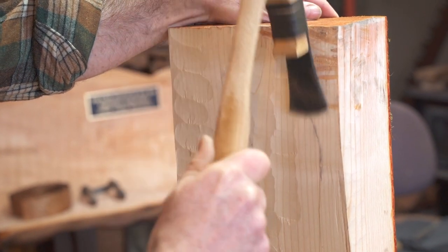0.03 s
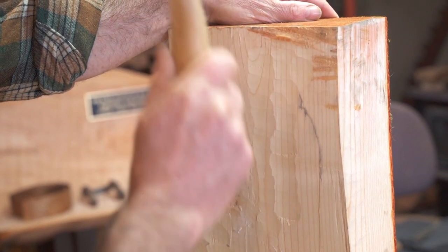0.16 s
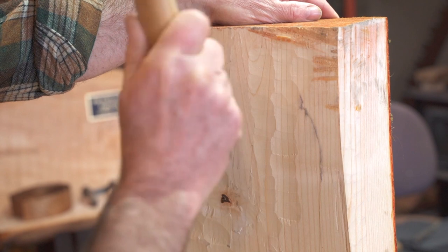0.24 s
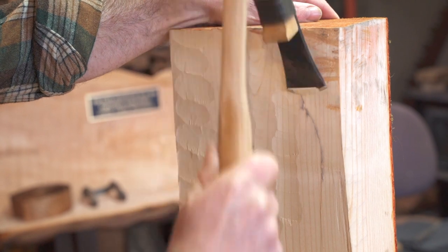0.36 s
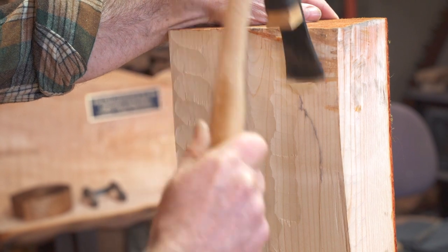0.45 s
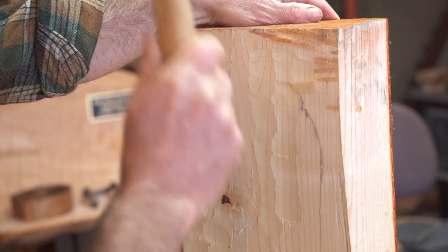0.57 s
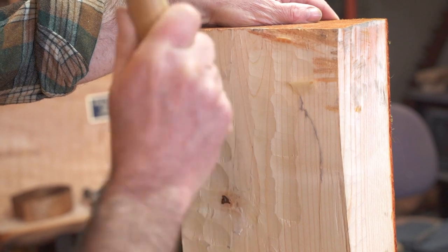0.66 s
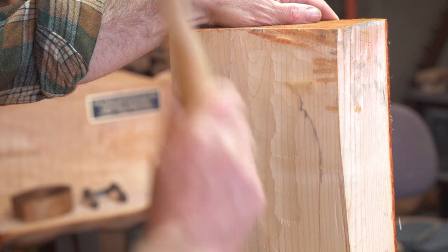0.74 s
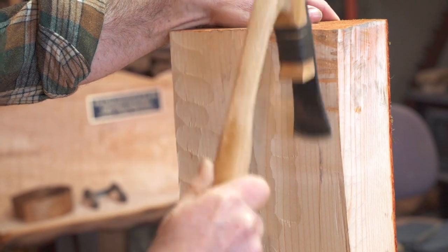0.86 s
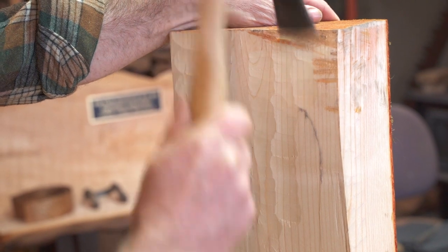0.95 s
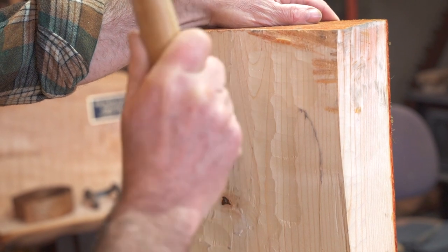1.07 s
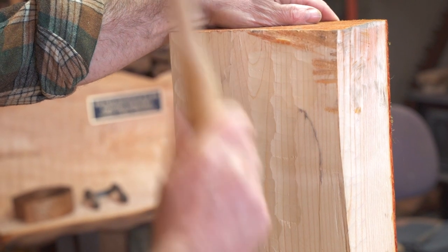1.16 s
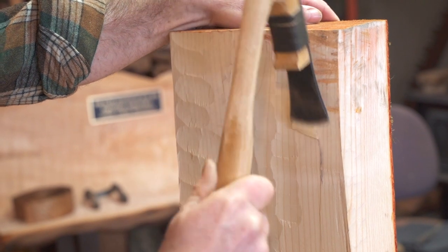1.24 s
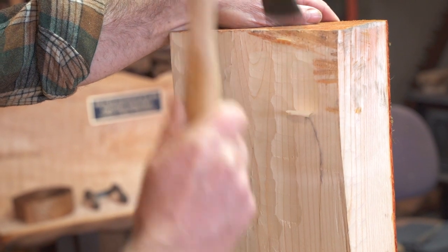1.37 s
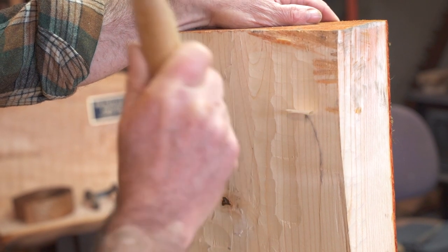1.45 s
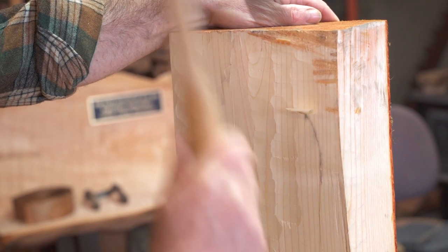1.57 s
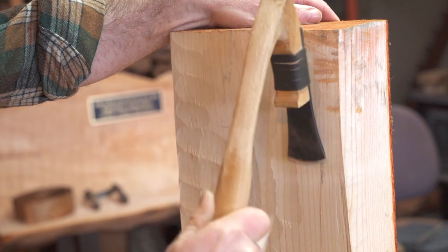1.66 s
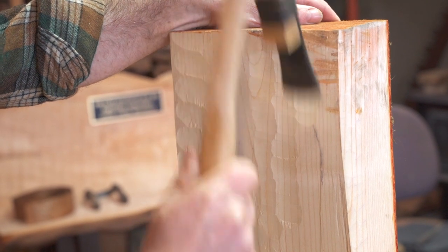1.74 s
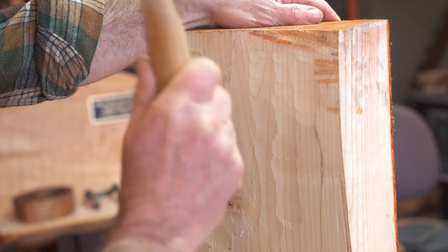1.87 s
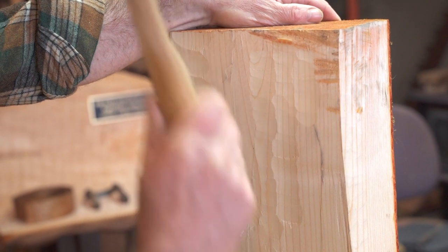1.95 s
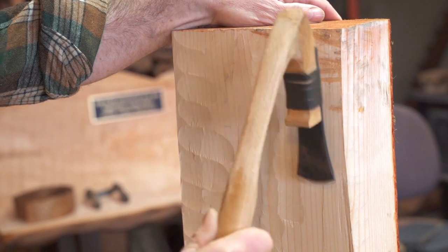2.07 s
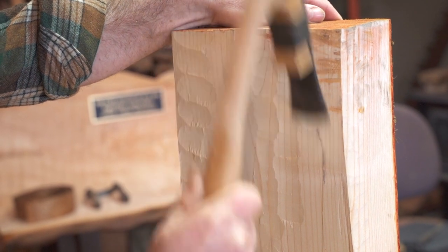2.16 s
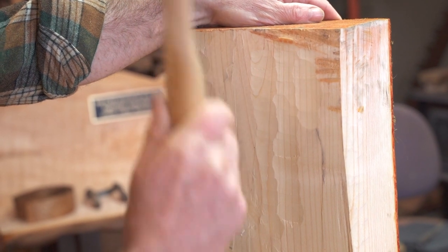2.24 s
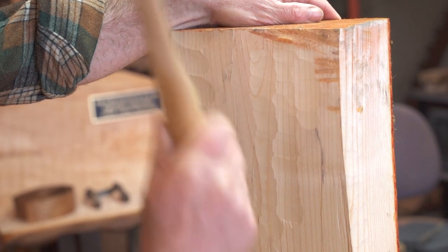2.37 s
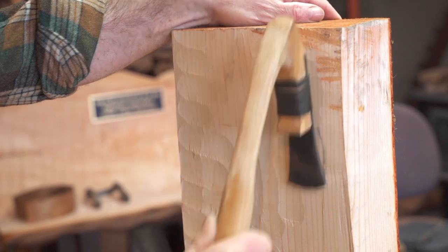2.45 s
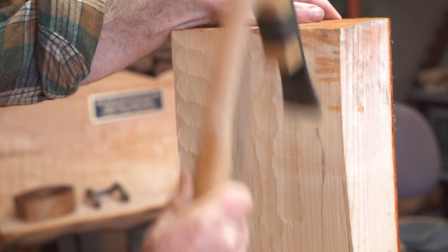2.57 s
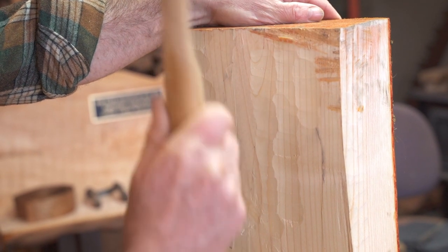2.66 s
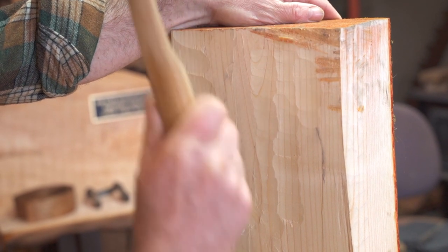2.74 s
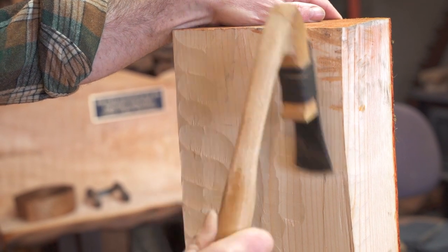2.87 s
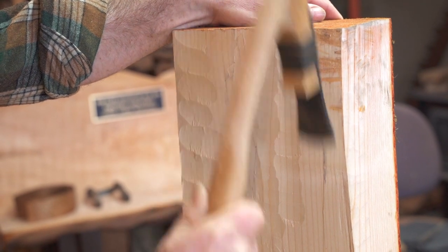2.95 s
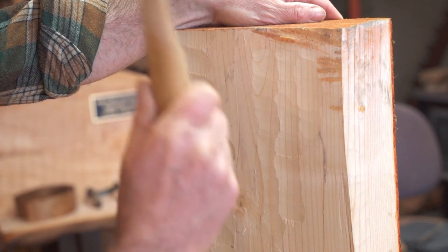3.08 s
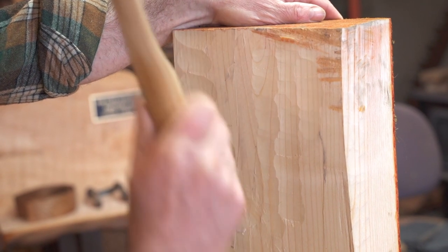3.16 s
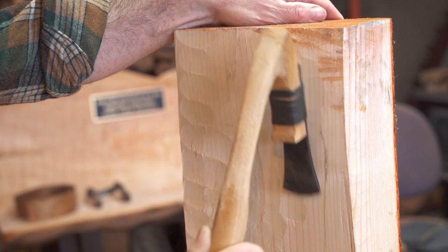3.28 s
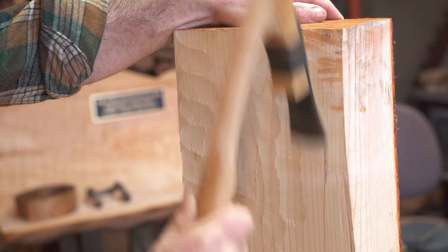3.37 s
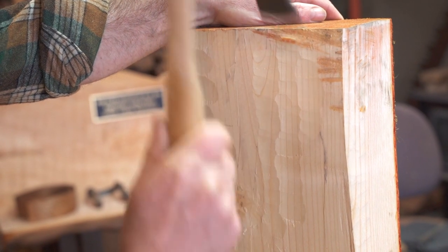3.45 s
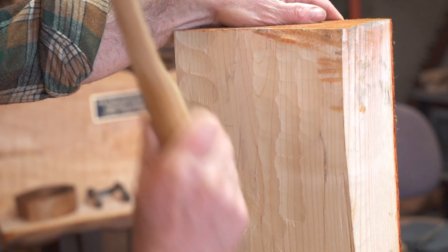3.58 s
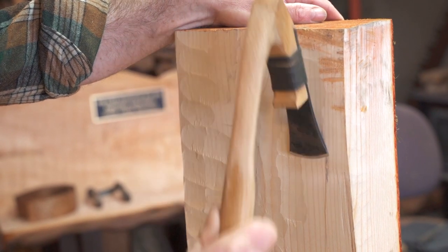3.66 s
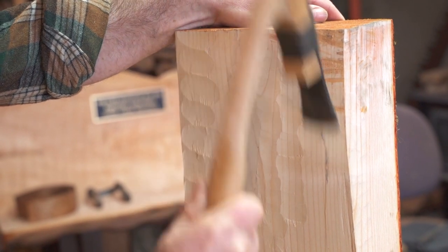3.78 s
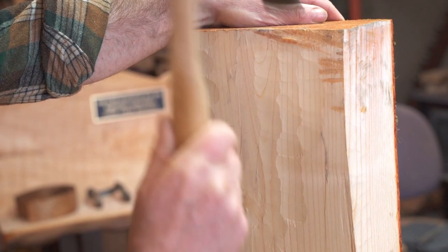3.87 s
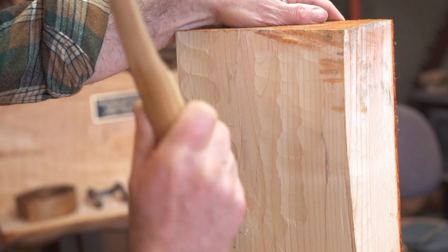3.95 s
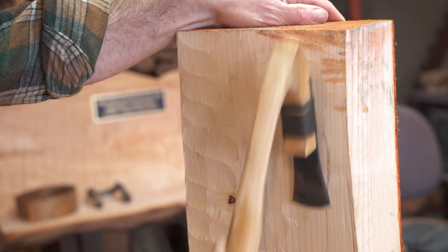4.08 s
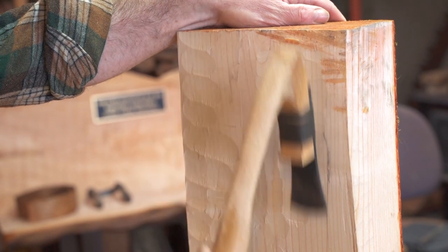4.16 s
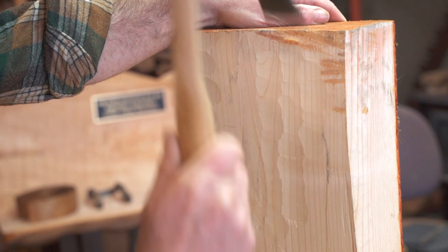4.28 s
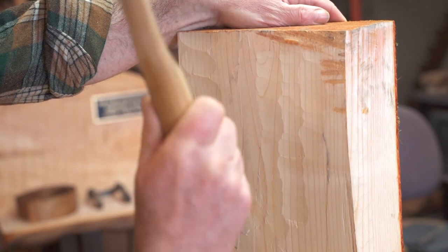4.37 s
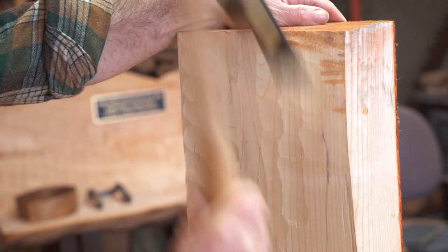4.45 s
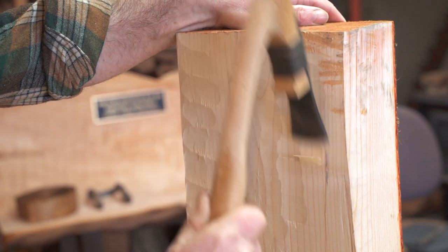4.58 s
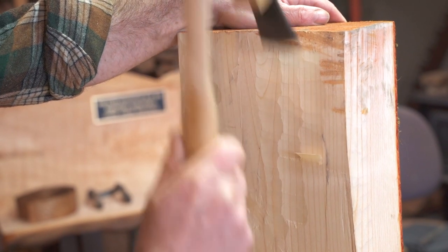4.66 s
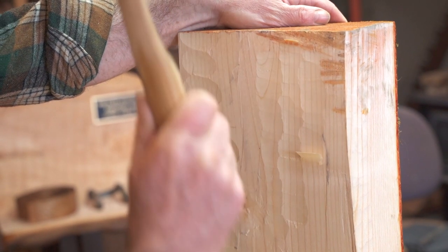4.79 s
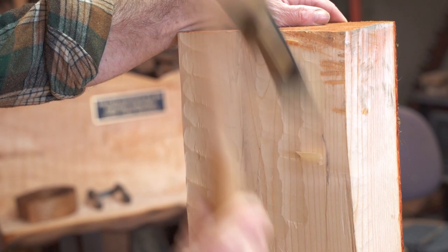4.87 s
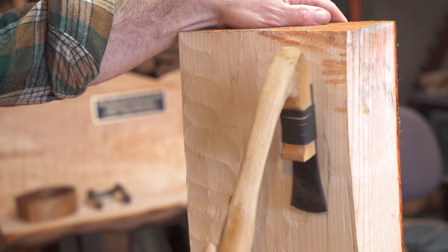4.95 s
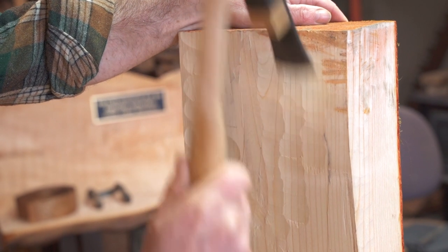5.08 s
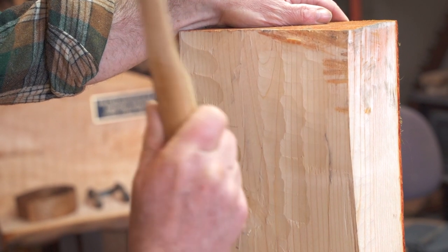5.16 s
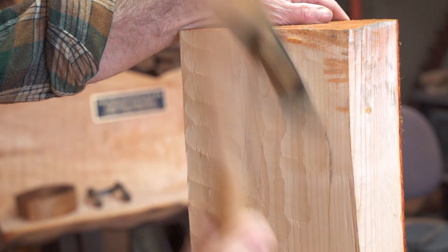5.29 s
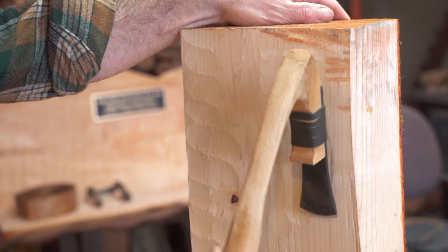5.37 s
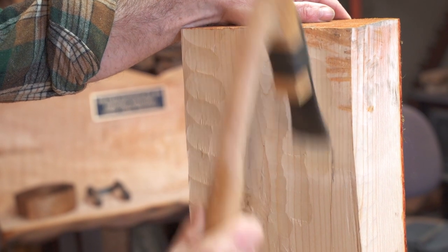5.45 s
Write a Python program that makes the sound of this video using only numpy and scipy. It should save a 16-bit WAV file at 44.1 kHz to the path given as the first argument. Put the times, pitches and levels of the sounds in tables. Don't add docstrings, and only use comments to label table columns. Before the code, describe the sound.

A small steel adze strikes a thick wooden block on a bench at an even pace, roughly every 0.4 seconds. Each blow is a hard, dry crack with a short woody ring and a low thump; between blows the block knocks softly and chips tick down. Small workshop, short room echo, close microphone overloading slightly on the hits.

```python
import sys
import numpy as np
from scipy import signal
from scipy.fft import rfft, irfft, next_fast_len
from scipy.io import wavfile
from scipy.ndimage import uniform_filter1d

SR = 44100
rng = np.random.default_rng(int(sys.argv[2]) if len(sys.argv) > 2 else 0)


def how_loud(loudness_db):
    steps = np.asarray(loudness_db, float) / 20
    return 10 ** steps


def unload_wav(signal):
    wavfile.write(
        sys.argv[1],
        SR,
        np.round(np.clip(np.atleast_2d(signal).T, -1, 1) * 32767).astype(np.int16),
    )


N = 243538
LEAD = SR // 20


def unit(x):
    return x / np.sqrt(np.mean(x ** 2) + 1e-20)


def peak(x):
    return x / np.max(np.abs(x))


def along(points, hz):
    f, v = np.transpose(points)
    return np.interp(np.log(hz + 1), np.log(f + 1), v)


def filtered(x, response):
    m = next_fast_len(len(x) + min(len(x), SR // 4))
    return irfft(rfft(x, m) * response(np.fft.rfftfreq(m, 1 / SR)), m)[:len(x)]


def colored(x, points):
    return filtered(x, lambda f: how_loud(along(points, f)))


def modes(table):
    def response(f):
        total = 0
        for k, (c, w, db) in enumerate(table):
            total = total + (-1) ** k * how_loud(db) * 1j * f * w / (c * c - f * f + 1j * f * w)
        return total
    return response


def below(hz, edge_hz):
    return lambda f: 1 / (1 + np.exp(np.clip((f - hz) / edge_hz, -50, 50)))


def add(track, s, x):
    part = track[max(round(s * SR) + LEAD, 0):][:len(x)]
    part += x[:len(part)]


def near(hz):
    return hz * (1 + 0.012 * rng.normal())


# f/Hz, t60/s
ROOM_T60 = [(100, 0.15), (300, 0.32), (1500, 0.22), (4000, 0.19), (8000, 0.18), (15000, 0.077)]


def shop(colour):
    hz, t, z = signal.stft(rng.standard_normal(SR // 3), SR, nperseg=256)
    level_db = colour(hz)[:, None] - 60 * t / along(ROOM_T60, hz)[:, None]
    tail = signal.istft(z * how_loud(level_db), SR, nperseg=256)[1]
    tail *= 1 - np.exp(-(np.arange(len(tail)) / SR / 0.0076) ** 2)
    return tail / np.linalg.norm(tail)


# f/Hz, level/dB
WALLS = [(100, -1.5), (400, -6.5), (1000, 3), (1500, 1.5), (4000, -5), (8000, -1), (16000, -8.5)]


def echoed(x, db):
    wet = how_loud(db) * signal.fftconvolve(x, shop(lambda hz: along(WALLS, hz)))
    add(wet, -LEAD / SR, x)
    return wet


def fibres(cut_ms):
    t = np.arange(SR // 8) / SR
    cut = (1 - np.exp(-t / 0.0001)) * np.exp(-(t / (cut_ms / 1000)) ** 3)
    cracks = cut * rng.standard_normal(len(t)) * how_loud(0.73 * rng.standard_normal(len(t)))
    cracks[:6] += 4
    return cut, cracks


def ring(cracks, hz, width_hz):
    early = np.exp(-np.arange(len(cracks)) / SR * hz / 14)
    return peak(filtered(cracks * early, modes([(near(hz), width_hz, 0)])))


# f/Hz, level/dB per Hz
SPLINTER = [(3000, -31), (5500, -0.5), (6800, 12.5), (8000, -15), (11000, -0.5), (15000, -2), (17000, -25)]
# f/Hz, width/Hz
BLOCK = [(340, 110), (480, 120), (630, 140)]
# f/Hz, width/Hz
TOOL = [(1410, 83), (1690, 120), (2300, 410), (3330, 260), (3950, 200)]
# f/Hz, width/Hz, level/dB at crispness 0
EDGE = [(2153, 93, -11.5), (2680, 540, -6), (3680, 300, -7), (4420, 820, -9), (4600, 1500, -12.5),
        (5600, 700, -15.5)]
# f/Hz, width/Hz, level of the subtracted resonance/dB
GAP = [(1145, 600, -1.5)]


def bite(cut, cracks, crisp_db, face_db, haft_db):
    blade_db = [g + 1.3 * crisp_db for g in (-3.5, -10)]
    tool_db = [face_db, -16.5, haft_db] + blade_db
    tear = peak(colored(rng.standard_normal(len(cut)), SPLINTER))
    blow = np.sqrt(cut) * how_loud(crisp_db - 8.5) * tear
    for (hz, width), g in zip(BLOCK, (-22.5, -19, -22.5)):
        blow += how_loud(g + 14) * ring(cracks, hz, width)
    for (hz, width), g in zip(TOOL, tool_db):
        blow += how_loud(g + 11.5) * ring(cracks, hz, width)
    for hz, width, g in EDGE:
        level_db = g + 1.5 * crisp_db + 9.5 + 1.8 * rng.normal()
        blow += how_loud(level_db) * ring(cracks, near(hz), width)
    return filtered(blow, lambda f: 1 - modes(GAP)(f))


# f/Hz, width/Hz, level/dB
LINGER = [(1400, 20, 0), (1500, 20, -1), (1690, 24, -6), (2070, 22, -7), (2200, 20, -3), (2390, 24, -5),
          (3320, 32, -9)]


def linger(cracks):
    slow = []
    for hz, width, g in LINGER:
        level_db = g - hz / 400 + 3 * rng.normal()
        slow.append((hz * (1 + 0.0035 * rng.normal()), 0.8 * width, level_db))
    return peak(filtered(np.pad(cracks, (0, SR // 8)), modes(slow)))


# f/Hz, level/dB per Hz
ANSWER = [(88, -26.5), (150, -1), (361, -2.5), (514, 0), (998, -27), (1210, -15), (1450, -6.5), (1940, -18),
          (2310, -13), (2760, -23.5), (3290, -17), (3920, -23), (4410, -26), (12700, -39), (16000, -44.5)]


def answer(crisp_db):
    tilt_db_per_octave = 4.5 + 0.3 * crisp_db
    sheen_db = 4

    def colour(f):
        octaves = np.log2(np.minimum(f + 100, 5000) / 1500)
        return along(ANSWER, f) + tilt_db_per_octave * octaves + sheen_db * f / 10000
    return shop(colour)


# f/Hz, level/dB, first crest/ms, t60/s
SWAY = [(20, 1, 12, 0.41), (9.8, -8, 65, 1)]


def bench():
    t = np.arange(SR // 2) / SR
    thump_db, thump_hz, sway_db, lag_ms = -25, 113.33, -23, -2.3
    thump = how_loud(thump_db + 5 - 60 * t / 0.24) * (1 - np.exp(-t / 0.0049))
    out = thump * np.sin(2 * np.pi * (near(thump_hz) * t + rng.random()))
    low = how_loud(thump_db - 3 - 60 * t / 0.25) * (1 - np.exp(-t / 0.012))
    out += low * np.sin(2 * np.pi * (0.64 * thump_hz * t + rng.random()))
    for hz, mode_db, crest_ms, t60 in SWAY:
        swing = np.cos(2 * np.pi * hz * (t - (crest_ms + lag_ms) / 1000))
        out += how_loud(sway_db + mode_db + 3.5 - 60 * t / t60) * (1 - np.exp(-(t / 0.013) ** 2)) * swing
    return out


# t/s, crispness/dB, cut face level/dB, haft level/dB, cut length/ms
BLOWS = [(-0.013, -11, -9, -9.5, 4.8), (0.399, -8.5, -6, -5, 5.4), (0.8177, 1, -6.5, -8, 5),
         (1.2288, -4, -9.5, -14.5, 7.1), (1.6471, -5.5, -13, -11.5, 4.3), (2.0579, -5.5, -12, -8, 5),
         (2.463, -10.5, -17, -10, 11), (2.8644, -15, -17, -13, 6), (3.276, -9.5, -12, -8, 10.9),
         (3.687, -17, -14.5, -18, 5.1), (4.0983, -10, -14.5, -9, 5.9), (4.5191, -8.5, -17, -4.5, 5.4),
         (4.93, -1.5, -8, -1.5, 7.3), (5.346, -2.5, -16.5, -7.5, 7.4)]


def adze():
    out = np.zeros(N + SR)
    for s, crisp_db, face_db, haft_db, cut_ms in BLOWS:
        room_db = -30 + 0.067 * crisp_db
        cut, cracks = fibres(cut_ms)
        add(out, s - 0.0004, bite(cut, cracks, crisp_db, face_db, haft_db))
        add(out, s, how_loud(room_db + 15) * linger(cracks))
        add(out, s, how_loud(room_db + 37.5) * answer(crisp_db))
        add(out, s, bench())
    return out


# t/s, rms level/dB, length/s
SCUFFS = [
    (3.179, -61, 0.053),
    (4.861, -60, 0.046),
    (1.011, -58.5, 0.024),
    (1.868, -66, 0.022),
    (4.273, -63, 0.069),
    (5.445, -50.5, 0.025),
]
# f/Hz, level/dB per Hz
SHAVING = [(800, -30.5), (2000, -7), (5000, 3), (8000, 0), (11500, 11.5), (15500, -3)]


def debris():
    grains = np.zeros(N + SR)
    t = np.arange(SR // 8) / SR
    for s, db, length in SCUFFS:
        grainy = how_loud(db - 26 * t / length + 2.6 * rng.standard_normal(len(t)))
        add(grains, s, grainy * (1 - np.exp(-t / 0.0014)) * rng.standard_normal(len(t)))
    t = np.arange(SR // 200) / SR
    for s, db, *_ in BLOWS:
        for when, size in rng.random((10, 2)):
            crumb = how_loud(db - 15 - 75 * when - 32 * size - 60 * t / 0.0025)
            add(grains, s + 0.0034 + 0.09 * when, crumb * rng.standard_normal(len(t)))
    return colored(grains, SHAVING)


# f/Hz, level/dB per Hz
FLOOR = [(12, -35.5), (20, -3.5), (42, -7.5), (86, -11.5), (160, -25), (244, -22), (372, -27.5), (452, -27),
         (888, -41.5), (1110, -36.5), (2970, -54.5), (15200, -54.5), (16500, -71)]


def floor():
    floor_db, patchy_db = -46.5, 3.5
    hz, _, z = signal.stft(rng.standard_normal(N), SR, nperseg=512)
    field = uniform_filter1d(rng.standard_normal(z.shape), 4, 0)
    field = unit(uniform_filter1d(field, 12, 1))
    patches = how_loud(patchy_db * field / (1 + (hz[:, None] / 2500) ** 2))
    air = signal.istft(z * patches, nperseg=512)[1][:N]
    return how_loud(floor_db) * unit(colored(air, FLOOR))


ROCK_HZ = (256.8, 454.2, 564)


def rattle():
    level_db, fade_db_per_s, taps_per_s = -47.5, 28, 150
    struck, now = np.transpose(BLOWS)[0], np.arange(N) / SR
    since = now - struck[np.maximum(np.searchsorted(struck, now) - 1, 0)]
    taps = (rng.random(N) < taps_per_s / SR) * how_loud(5 * rng.standard_normal(N))
    body = modes([(ROCK_HZ[0], 40, -4), (ROCK_HZ[1], 40, 0), (ROCK_HZ[2], 90, -8)])
    soft = filtered(taps, lambda f: body(f) / (1 + 1j * f / 500) ** 5)
    return how_loud(level_db - fade_db_per_s * since) * unit(soft)


# t/s, peak level/dB, t60/s
RETURNS = [(0.124, -31, 0.044), (0.518, -47, 0.22), (0.953, -31, 0.096), (1.36, -38, 0.11),
           (1.78, -33, 0.12), (2.2, -32, 0.17), (2.601, -35, 0.11), (3.001, -34, 0.19), (3.412, -30, 0.18),
           (3.824, -35.5, 0.25), (4.237, -40.5, 0.17), (4.679, -38, 0.1), (5.058, -34, 0.11),
           (5.473, -36.5, 0.13)]
# t/s, peak level/dB, t60/s
BOUNCES = [(0.139, -37, 0.26), (0.192, -24.5, 0.062), (0.301, -39, 0.12), (0.319, -31.5, 0.056),
           (.376, -40, 0.13), (0.416, -9.5, 0.059), (0.582, -29, 0.083), (0.967, -33.5, 0.18),
           (0.994, -38, 0.099), (1.02, -31.5, 0.17), (1.135, -43, 0.1), (1.405, -37, 0.099),
           (1.823, -36, 0.21), (1.852, -29, 0.19), (1.964, -39, 0.1), (2.258, -32.5, 0.091),
           (2.301, -39.5, .065), (2.383, -38.5, 0.13), (2.642, -35, 0.097), (2.658, -34, 0.2),
           (3.431, -34, 0.081), (3.455, -35, 0.081), (3.474, -28.5, 0.13), (3.595, -42, 0.084),
           (3.885, -28, 0.075), (4.169, -35, 0.056), (4.277, -31, 0.12), (4.413, -38, 0.058),
           (5.117, -27, 0.078), (5.234, -36, 0.09)]


def rocking():
    out, t = np.zeros(N + SR), np.arange(SR // 5) / SR
    add(out, 0, rattle())
    for s, db, t60 in RETURNS + BOUNCES:
        detune = 1 + 0.02 * rng.standard_normal(3)
        mode_db = (-10.5, 0, -13) + 5 * rng.standard_normal(3) * [1, 0, 1]
        knock = np.zeros(len(t))
        for hz, d, g, share in zip(ROCK_HZ, detune, mode_db, (1.1, 0.7, 0.6)):
            knock += how_loud(g - 60 * t / (t60 * share)) * np.sin(2 * np.pi * hz * d * t)
        knock *= how_loud(db + 6) * (1 - np.exp(-(t / 0.0015) ** 2))
        add(out, s, echoed(knock, db=-9))
    return out


# t/s, peak level/dB, dull part level/dB rel, top part level/dB rel
CHIPS = [(0.0694, -44, -5, -16), (0.0909, -26.5, -2.5, 7.5), (0.4845, -49, 8, -9), (0.906, -31.5, 1, 12),
         (0.9264, -34, 8, -6), (1.0116, -57.5, -7.5, -5), (1.264, -11, -27, -25), (1.747, -38, -3, 5),
         (1.872, -52, 1.5, 2.5), (2.1416, -48, -11, 12.5), (2.273, -55.5, 10, -7), (2.691, -61, 16, -19),
         (2.9374, -52, 2, 9), (2.9791, -34, 7.5, 2.5), (3.0715, -69, 1.5, -8), (3.4201, -52.5, -9.5, 3),
         (3.7841, -33, -2.7, 8.5), (3.8168, -64, 21, -12), (3.8772, -56, 3, 6), (3.8857, -57, -5, 7.5),
         (4.265, -48.5, 0, 3), (4.279, -43.5, 8.5, -7.5), (4.5674, -40, 13, 5), (4.5865, -36.5, 5, 6),
         (4.6114, -51.5, -2, -15), (4.6374, -66.5, -1.5, -9), (4.8066, -50.5, -2.5, 7),
         (4.824, -54, -5.5, 8), (5.0254, -33, -15, -6.5), (5.446, -34.5, -19, -6.5)]


def chips():
    out, t = np.zeros(N + SR), np.arange(SR // 20) / SR
    chip_t60_s = 0.007
    lump = modes([(450, 260, 27), (1534, 190, 32), (2140, 1400, 20)])
    offcut = how_loud(-17) * peak(filtered(np.exp(-t / 0.0001), lump))
    add(out, 0.047, echoed(offcut, db=-7))
    for s, db, dull_db, top_db in CHIPS:
        spikes = how_loud(5.7 * rng.standard_normal(len(t)) - 60 * t / chip_t60_s)
        puff = rng.standard_normal(len(t)) * spikes * (1 - np.exp(-t / 0.0009))
        hz = np.array([1430, 2100, 4400, 6500, 10500, 14000]) * (1 + 0.05 * rng.standard_normal(6))
        dull = modes([(850, 300, -8), (hz[0], 250, -2), (hz[1], 550, 0)])
        bright = modes([(hz[2], 1800, 0), (hz[3], 2500, -3 + 4 * rng.normal())])
        top = modes([(hz[4], 2500, 0), (hz[5], 2500, 0)])
        tick = how_loud(dull_db) * peak(filtered(puff, dull))
        tick += peak(filtered(puff, bright))
        tick += how_loud(top_db) * peak(filtered(puff, top))
        add(out, s, echoed(how_loud(db) * tick, db=-17))
    return out


def scene():
    sources = adze() + debris() + rocking() + chips()
    return (sources[LEAD:LEAD + N] + floor())[None]


def low_pass(x):
    return signal.sosfilt(signal.butter(12, 16840, fs=SR, output="sos"), x)


def record(dry):
    clip_top = 0.55
    heard = filtered(dry[0], below(15900, 90))
    clipped = heard / (1 + np.abs(heard / clip_top) ** 8) ** (1 / 8)
    mix = filtered(clipped, below(16300, 250))[None]
    return low_pass(mix)


dry = scene()
out = record(dry)
unload_wav(out)
```